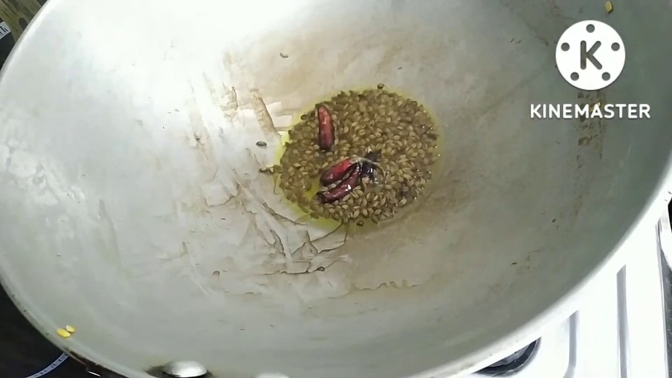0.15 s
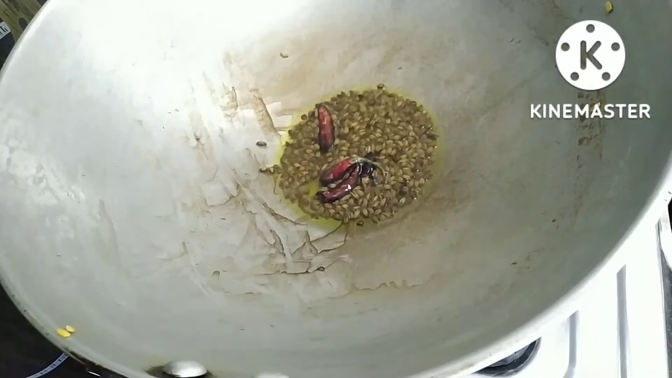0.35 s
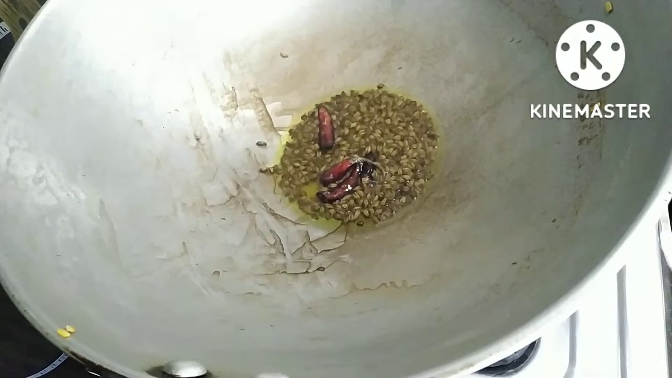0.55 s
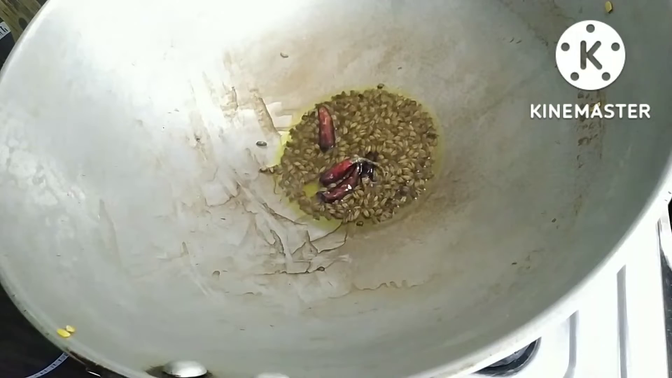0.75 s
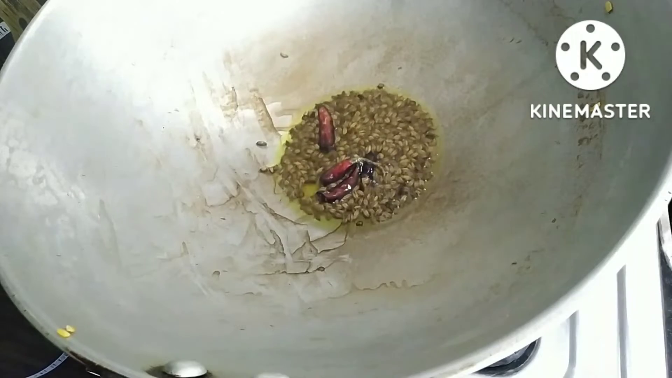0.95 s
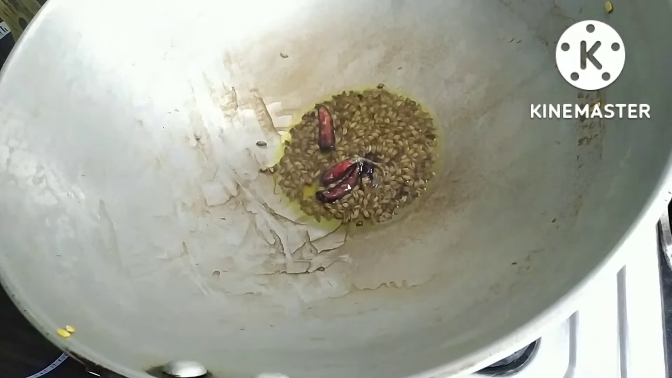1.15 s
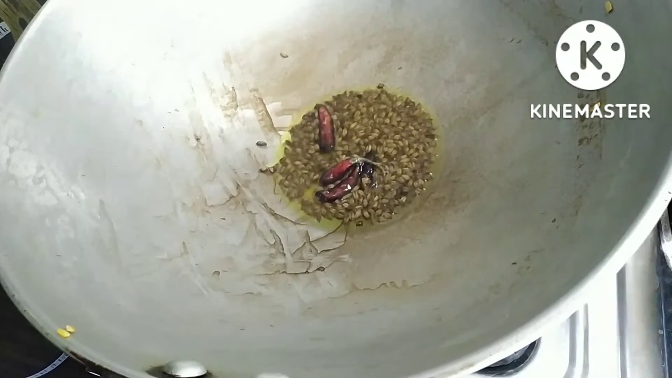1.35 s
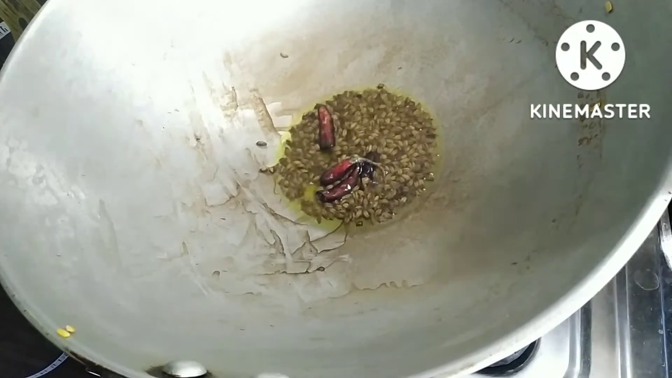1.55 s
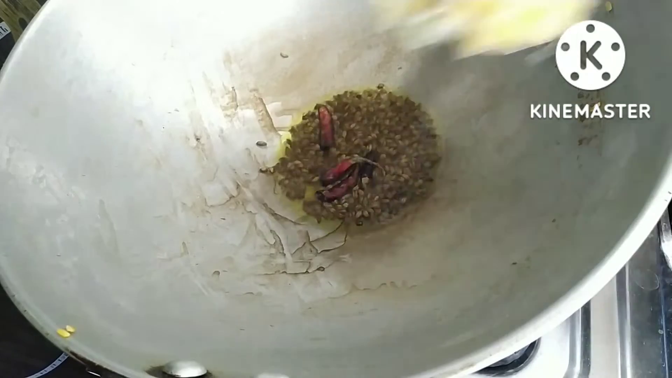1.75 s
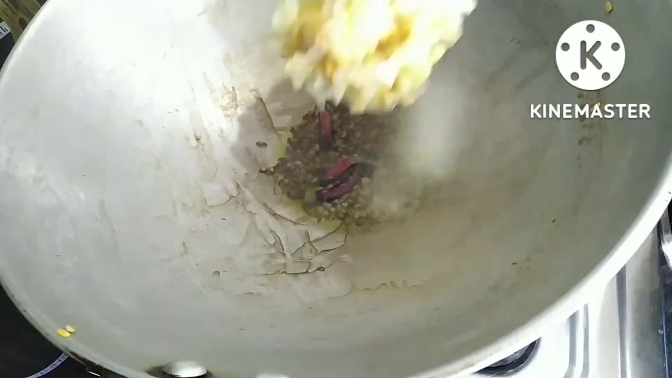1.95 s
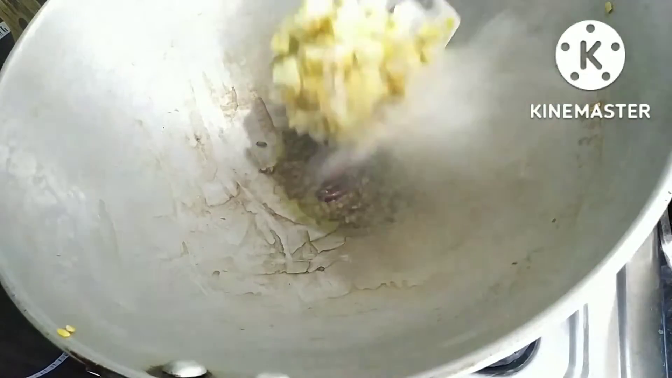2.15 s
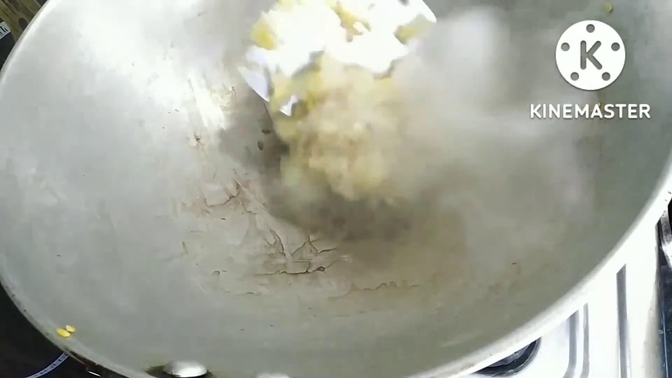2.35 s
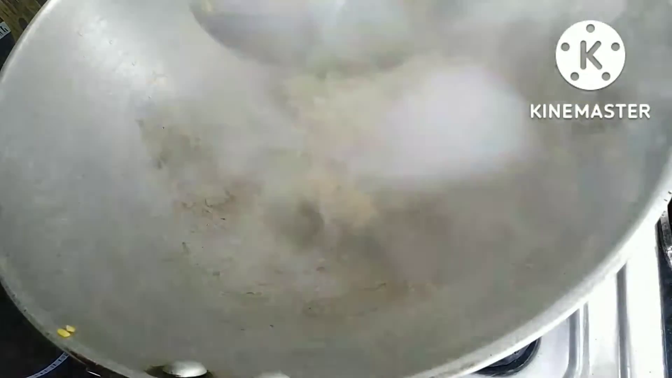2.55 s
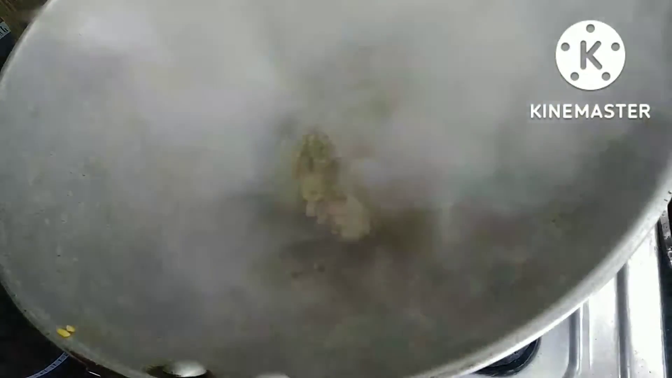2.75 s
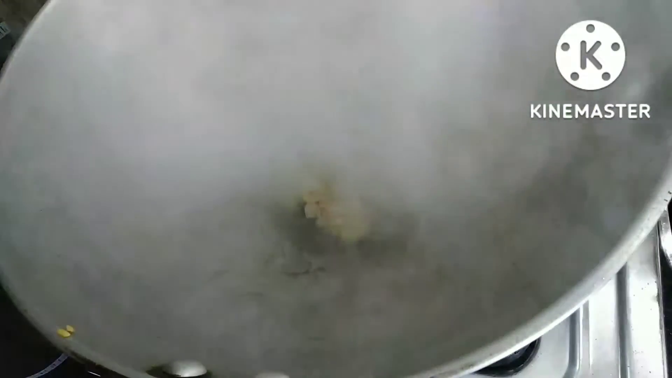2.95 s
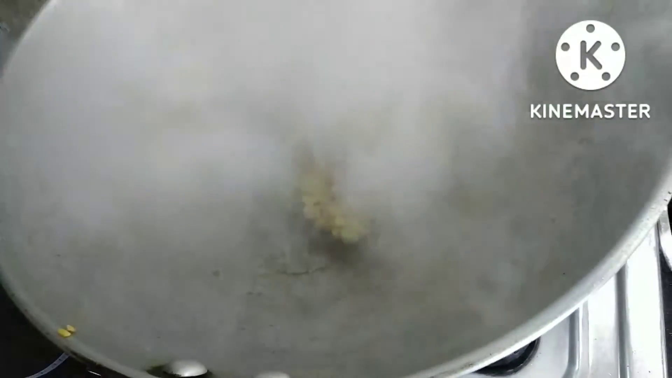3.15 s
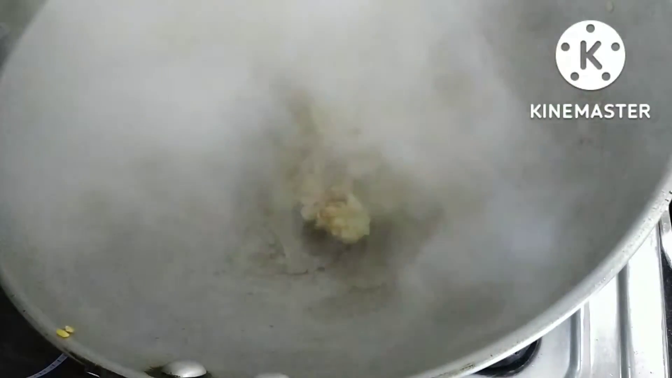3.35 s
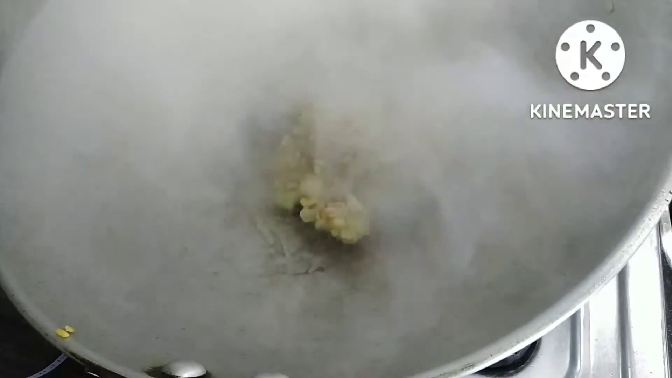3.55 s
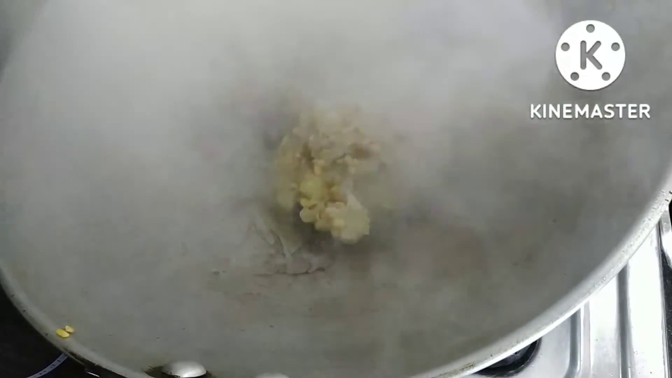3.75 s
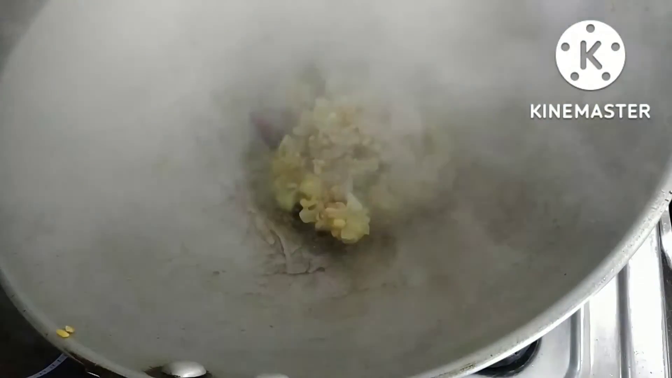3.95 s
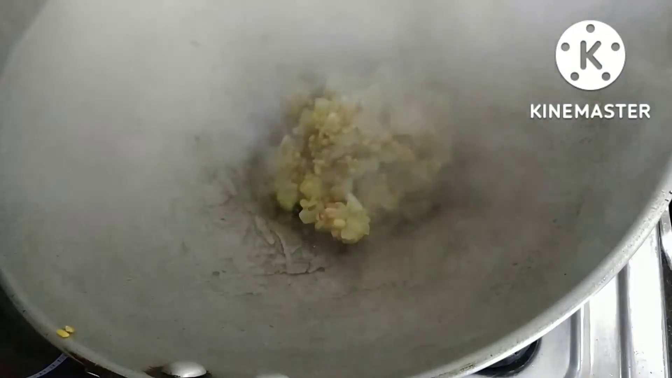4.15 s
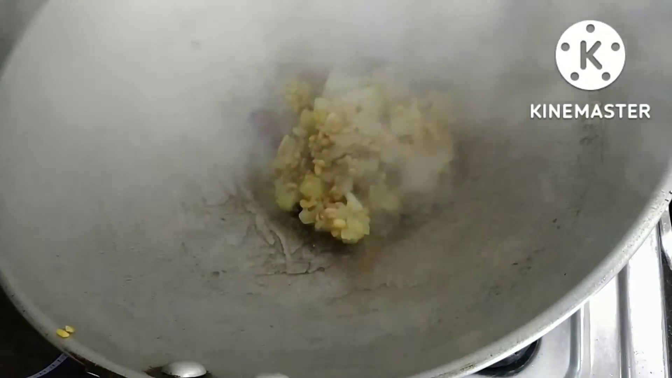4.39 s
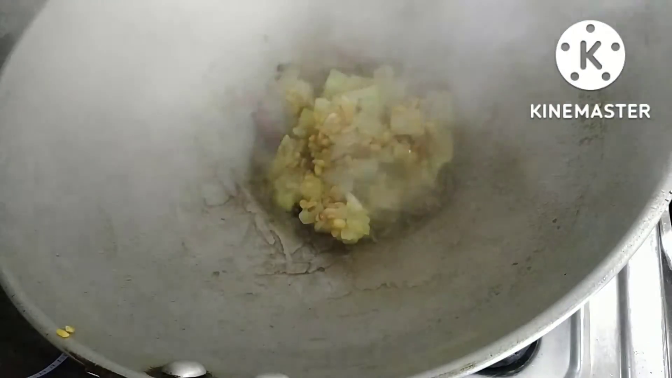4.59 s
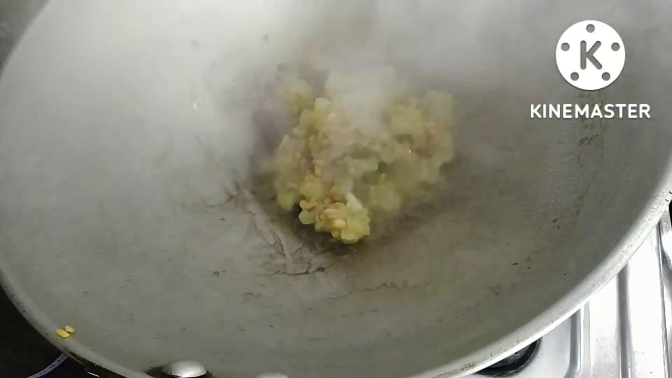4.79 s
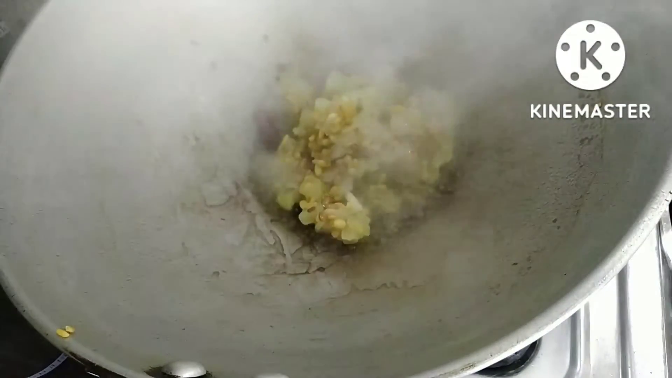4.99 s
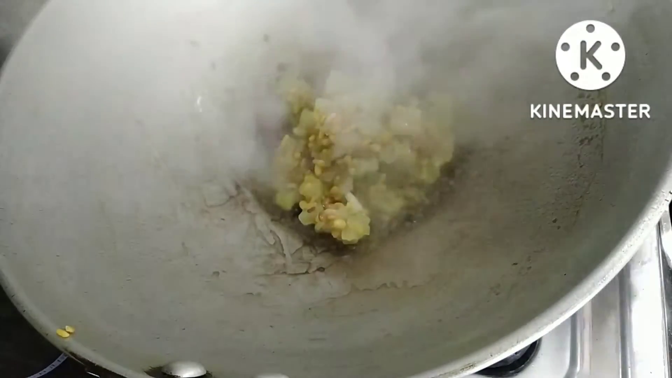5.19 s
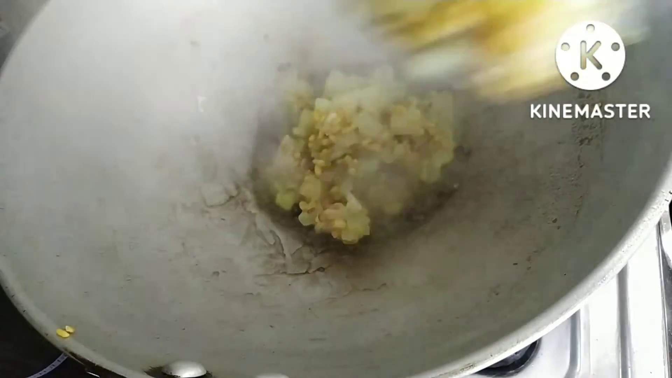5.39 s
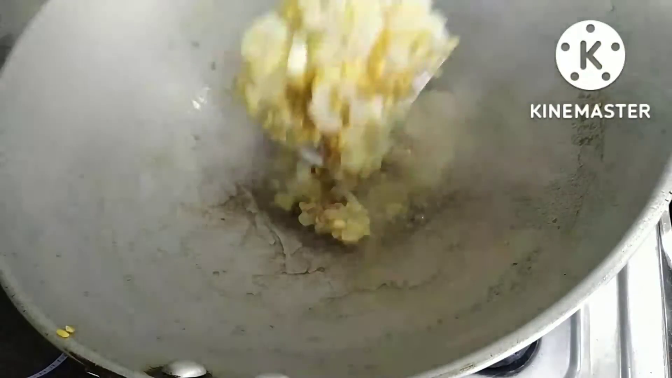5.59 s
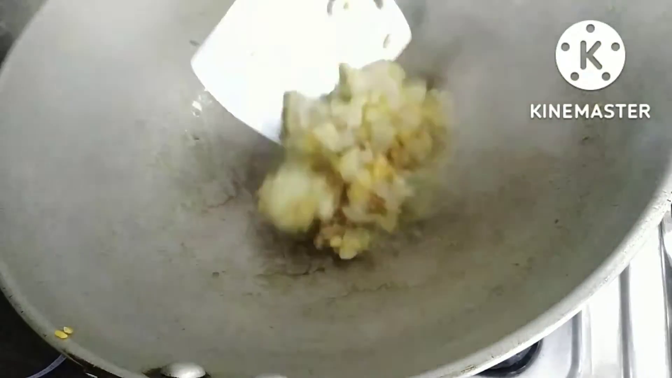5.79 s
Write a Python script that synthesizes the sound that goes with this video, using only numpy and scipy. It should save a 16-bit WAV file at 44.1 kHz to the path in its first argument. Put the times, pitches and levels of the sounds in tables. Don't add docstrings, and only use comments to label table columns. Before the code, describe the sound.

Spiced oil ticks quietly and a ladle knocks a metal bowl, then wet vegetables hit the pan in a violent, distorting sizzle that slowly eases.

```python
import sys
import numpy as np
from scipy import signal
from scipy.fft import rfft, irfft
from scipy.io import wavfile
from scipy.ndimage import uniform_filter1d, minimum_filter1d

SR = 44100
rng = np.random.default_rng(int(sys.argv[2]) if len(sys.argv) > 2 else 0)


def transcribe(signal):
    frames = np.atleast_2d(signal).T
    limited = np.clip(frames, -1, 1)
    pcm = np.round(limited * 32767).astype(np.int16)
    wavfile.write(sys.argv[1], SR, pcm)


def volts_from_db(level):
    exponent = np.asarray(level, float) / 20
    return 10 ** exponent


N = 257014

# t/s, vigour/dB
BOIL = [(2.1, 6), (2.3, 5), (2.45, 9.5), (2.6, 13.5), (2.75, 11.5), (2.95, 5.5), (3.2, 2.5), (3.5, -1),
        (3.9, -4.5), (4.05, -1), (4.3, -1), (4.5, -2.5), (5.0, -3.5), (5.35, -3.5), (5.55, -4.5),
        (5.72, -4.5), (5.8, -2.5), (5.83, -10)]
# f/Hz, level per Hz/dB
SIZZLE_COLOUR = [(60, -22), (200, -28.5), (1000, -20), (2000, -15.5), (3300, -6), (6000, -5.5),
                 (7500, -4.5), (9500, -2), (11500, -4), (14000, -8), (15500, -10.5)]
# f/Hz, share/0-1
SURGE_SHARE = [(300, 1.1), (1500, 0.57), (4000, 0.19), (9000, 0.04)]
# t/s, peak level/dB
SPIKES = [(2.1227, -21), (2.4127, -12), (2.449, -7), (2.4748, -13), (2.766, -1), (2.8073, 0), (3.1005, -8),
          (3.237, -6), (3.2856, -4.5), (3.3784, -5), (3.456, -12.5), (3.547, -9), (3.722, -12),
          (3.8912, -33), (3.97, -11), (3.978, -16), (4.1937, -9.5), (4.3643, -15), (4.423, -14.5),
          (4.542, -15), (4.6852, -9.5), (4.6916, -9.5), (4.7488, -13), (4.8103, -15), (5.2504, -15.5),
          (5.416, -14.5), (5.4529, -14.5), (5.5236, -8.5), (5.538, -12), (5.8278, -14)]
# t/s, peak level/dB, length/s
SLIPS = [
    (2.189, -22, 0.0023),
    (2.465, -29, .003),
    (2.559, -12, 0.0011),
    (2.726, -4.5, 0.0012),
    (2.82, -21, 0.0027),
    (3.97, -33, 0.0033),
    (4.693, -33, 0.0033),
]
# t/s, peak level/dB, pitch f/Hz, left over right/dB, fizz level/dB
POPS = [(.388, -25, 11000, -4, -19), (0.5042, -24, 10300, .5, -25.5), (.5675, -42.5, 9250, 1.5, -11),
        (.628, -25.5, 9940, -1, -24), (.6468, -32, 10300, -1, -20), (0.8328, -26.5, 6740, -7, -7),
        (1.0874, -38, 9860, 3.5, -14), (1.1362, -39, 6750, 6, -5), (1.3278, -35, 12400, 7, -12),
        (1.4161, -39, 11600, 2, -14), (1.638, -33.5, 10000, 1, -13), (1.699, -33, 9300, 3, -9.5),
        (1.7084, -39, 7030, 9, -7), (1.8402, -28, 7450, 0, -13.5), (2.011, -21, 9000, -4, -8),
        (2.0345, -12, 8000, -2, -12)]
# t/s, blow level/dB, left over right/dB, brightness/dB per octave
KNOCKS = [
    (0.8707, -8, 8, 3),
    (0.8806, -21, -18, 0),
    (.889, -46, 0, 1),
    (0.9044, -16, -6, 3.3),
    (1.101, -43, 2, -2),
    (1.165, -40.5, 7.5, -3.5),
    (1.178, -41, 2, 1),
    (1.197, -48, 17, 8),
    (1.335, -43.5, 4, -3.5),
]
# f/Hz, level/dB, time to fall 60 dB t60/s
BOWL_MODES = [(935, -35, 0.087), (1740, -9.5, 0.023), (1960, -24, 0.07), (2860, -20.5, 0.022),
              (4016, -25, 0.059), (4630, -28, 0.16), (5000, -13, 0.0073), (7149, -45, 5.0),
              (8740, -26, 0.062), (9300, -33, 0.19), (11160, -42, 2.7), (11510, -46, 5.0),
              (12000, -33, 0.071), (12400, -37, 0.13),
              (103, -29, .12), (337, -32, 0.16), (477, -30.5, .1), (762, -24.5, 0.05), (842, -24.5, .08)]
# f/Hz, level per Hz/dB
BOWL_CRACK = [(90, -51), (320, -15), (760, -16), (970, 8), (1330, -14), (1700, -2), (2300, -3.5),
              (2800, -8.5), (3400, -10), (4500, -16), (5700, -23), (7500, -8.5), (9700, -4), (15500, -24)]
# t/s, blow level/dB, left over right/dB, brightness/dB per octave
BUMPS = [
    (-.03, -30, 0.5, 4.5),
    (.612, -64, 8, 8),
    (.665, -62, 1, 3.5),
    (.72, -65.5, 5, 5.5),
    (.775, -67, 2, 9),
]
# f/Hz, level/dB, t60/s
POT_MODES = [(116, -8, 0.82), (328, -3, 4.5), (536, -13, 0.25), (697, -6, 0.83), (840, -2, 0.28),
             (1035, -22, 0.59), (1375, -5.5, 5.0), (2105, -22, 0.22), (3600, -43, 5.0), (4050, -11, 0.037),
             (4940, -35, 5.0), (5749, -38, 0.24)]
# f/Hz, level per Hz/dB
POT_CRACK = [(35, -47), (60, -22), (110, 2), (167, -5), (312, 11.5), (599, -12), (705, -7), (1670, -22),
             (2100, -23), (10700, -40), (15500, -51)]
# t/s, level/dB, f/Hz, t60/s
THUDS = [
    (.357, -38.5, 153, 0.12),
    (0.399, -41, 157, .09),
]
# f/Hz, t60/s
KITCHEN = [(200, 0.49), (530, 0.84), (1390, 0.57), (3680, 0.69), (9700, 0.43)]
# f/Hz, level per Hz/dB
FLOOR = [(18, -56), (35, -45), (70, -1), (120, -8.5), (170, -18.5), (300, -26.5), (600, -23), (1300, -27),
         (3200, -22.5), (5300, -21), (6500, -20), (10500, -18), (13000, -24.5), (15600, -29)]
# f/Hz, likeness/0-1
FLOOR_SAME = [(100, 0.97), (300, 0.75), (800, .2), (3000, 0.023)]
# f/Hz, rms level/dB
HUM = [(226.1, -81), (522.2, -80), (640.6, -86), (710.6, -80.5)]
# f/Hz, rarity of a gap/standard deviations
GAPS = [(2200, 3.6), (3000, 2.3), (3500, 1.45), (5600, 1.55), (7000, 2.7), (10500, 3.2), (12800, 1.55),
        (14300, 1.7), (15000, 2.6)]

LEAD = 4410
LANDS_S, SPREAD_S = 2.014, 0.077
FIRST_DROPS_DB, SPREAD_BEND = -22.5, 1.32
SIZZLE_DB, SIZZLE_FOLLOWS, SURGE_FOLLOWS = -17, 0.26, 0.93
LOW_LAG_DB = -28
FLASH_DB, FLASH_FADES_S, FLASH_FULL_HZ = 2.5, 0.31, 12000
CRACKLE_DB, CRACKLE_FOLLOWS, CRACKLE_SPREAD, CRACKLE_FADE_DB_PER_S = -32.5, 0.3, 1.52, 3
SPIKES_PER_S, SPIKE_OVER_DB, SPIKE_FOLLOWS = 17, 0, 0.48
SPIKE_SCATTER_DB, SPIKE_CAP = 5, 1.2
RUMBLE_EXTRA_DB, RUMBLE_END_DB, RUMBLE_SETTLE_S = 16, -5.5, 0.58
FIZZ_EXTRA_DB, FIZZ_END_DB, FIZZ_SETTLE_S = 4, -3, 0.84
STIR_S, STIR_DB, STIR_LASTS_S = 1.16, 5.5, 0.092
FLOOR_DB, RUMBLE_TOP_HZ = -55.5, 250


def spread(t):
    return np.clip((t - LANDS_S) / SPREAD_S, 0, 1)


def swell_db(t):
    first = volts_from_db(FIRST_DROPS_DB)
    return 20 * np.log10(first + (1 - first) * spread(t) ** SPREAD_BEND)


def sizzle():
    t = np.arange(N) / SR

    def shape_db(hz, s):
        surge_db = SURGE_FOLLOWS * curve(BOIL, s) + LOW_LAG_DB * (1 - spread(s))
        flash_tilt = np.minimum(hz / FLASH_FULL_HZ, 1) ** 2
        flash_db = FLASH_DB * flash_tilt * np.exp(-abs(s - LANDS_S) / FLASH_FADES_S)
        return read(SIZZLE_COLOUR, hz) + read(SURGE_SHARE, hz) * surge_db + flash_db

    dense = hiss(shape_db, lambda hz: 0.085 + 0 * hz, lag=5.02, patchy_db=0.65)
    bursts = (rng.random(N) < 300 / SR) * np.minimum(rng.exponential(1, N), 4)
    flicker = 1 + 0.1 * signal.lfilter([1], [1, -np.exp(-1 / (0.00065 * SR))], bursts)
    flicker /= np.sqrt(np.mean(flicker ** 2))
    port_db = np.array([[4.1], [4.9]])
    level_db = SIZZLE_DB + SIZZLE_FOLLOWS * curve(BOIL, t) + swell_db(t) + port_db
    return volts_from_db(level_db) * dense * flicker * (t > LANDS_S)


def crackle():
    t = np.arange(N) / SR
    level_db = CRACKLE_DB + CRACKLE_FOLLOWS * curve(BOIL, t) + CRACKLE_SPREAD * swell_db(t)
    level_db -= CRACKLE_FADE_DB_PER_S * (t - LANDS_S)
    u = np.arange(-40, 400)
    creep = 0.02 * np.exp(-u / 90.0) * (u > 0)
    blip = np.exp(-0.5 * (u / 2.43) ** 2) + creep

    clumps = volts_from_db(3.0 * evened(uniform_filter1d(rng.standard_normal(N), size=500)))
    per_s = 900 * volts_from_db(0.6 * (level_db + 38.5)) * clumps
    sign = np.where(rng.random(N) < 0.12, -1, 1)
    size = volts_from_db(2.06 * np.minimum(rng.exponential(1, N), 3)) * sign
    train = size * (rng.random(N) < per_s / SR)
    small = signal.oaconvolve(train - uniform_filter1d(train, size=4000), blip)[40:N + 40]
    small *= volts_from_db(level_db + 9.5) / np.sqrt(uniform_filter1d(small ** 2, size=13000) + 1e-9)

    scatter_db = SPIKE_SCATTER_DB * np.minimum(rng.standard_normal(N), SPIKE_CAP)
    large_db = SPIKE_OVER_DB + SPIKE_FOLLOWS * level_db + scatter_db + 4.5
    large = (rng.random(N) < SPIKES_PER_S / SR) * spread(t) * volts_from_db(large_db)
    s, db = np.transpose(SPIKES)
    large[np.minimum(np.round(s * SR).astype(int), N - 1)] = volts_from_db(db + 6.5)

    both = small * (t > LANDS_S) + signal.oaconvolve(large, blip)[40:N + 40]
    low_cut = signal.butter(2, 45, "high", fs=SR, output="sos")
    return signal.sosfilt(low_cut, both) * volts_from_db(np.array([[-28], [0]]))


def slips():
    t, out = np.arange(N) / SR, np.zeros((2, N))
    for s, db, length in SLIPS:
        u = np.clip((t - s) / length, 0, 30)
        out[1] -= volts_from_db(db) * np.e * u * np.exp(-u)
    return out


def pop(db, hz, fizz_db):
    t = np.arange(1024) / SR
    fizz_colour = [(0.11 * hz, -50), (0.66 * hz, -22), (0.93 * hz, -4), (hz, 0), (1.25 * hz, -6), (1.6 * hz, -22)]
    fizz = volts_from_db(fizz_db) * coloured(fizz_colour, count=1024) * np.exp(-t / 0.0055)
    snap = pulse([(1000, -36), (3500, -7), (hz, 0), (16000, -3)], count=1024)
    tick = 0.84 * np.sin(2 * np.pi * hz * t) * np.exp(-t / 0.00036)
    onset = np.minimum(t / 0.000051, 1)
    return volts_from_db(db) * ((tick + fizz) * onset + 1.26 * snap)


def knock(modes, colour, db, bright_db, damping, blow_db, crack_db, crack_s):
    t = np.arange(LEAD * 3) / SR
    ring = np.zeros(len(t))
    for hz, mode_db, t60 in modes:
        detune = rng.uniform(0.95, 1.015)
        held_t60 = min(t60, damping * np.sqrt(1000 / hz))
        fall_db = mode_db + bright_db * np.log2(hz / 1000) - 60 * t / held_t60
        ring += volts_from_db(fall_db) * np.sin(2 * np.pi * hz * detune * t)
    tilted = [(hz, c_db + bright_db * np.log2(hz / 1000)) for hz, c_db in colour]
    crack = volts_from_db(crack_db) * coloured(tilted, count=len(t)) * np.exp(-t / crack_s)
    blow = volts_from_db(blow_db) * pulse(tilted, count=len(t))
    return volts_from_db(db) * ((ring + crack) * np.minimum(t / 0.0004, 1) + blow)


def thud(db, hz, t60):
    t = np.arange(LEAD) / SR
    return volts_from_db(db - 60 * t / t60) * np.sin(2 * np.pi * hz * t) * np.minimum(t / 0.0031, 1)


def kitchen(x):
    taps = np.zeros((2, SR))
    at = np.arange(260, SR - 20, 20) + rng.integers(0, 20, (2, (SR - 261) // 20))
    np.put_along_axis(taps, at, rng.choice([-1., 1.], at.shape), 1)
    hz, t, z = signal.stft(taps, SR, nperseg=256)
    fall = volts_from_db(-60 * t / read(KITCHEN, hz)[:, None])
    tail = signal.istft(z * fall, SR, nperseg=256)[1]
    return signal.fftconvolve(x, tail / np.linalg.norm(tail[0]), axes=1)[:, :x.shape[1]]


def floor():
    def shape_db(hz, s):
        rumble_db = RUMBLE_END_DB + RUMBLE_EXTRA_DB * np.exp(-s / RUMBLE_SETTLE_S)
        stir_db = STIR_DB * np.exp(-((s - STIR_S) / STIR_LASTS_S) ** 2) * (hz > 5500)
        fizz_db = FIZZ_END_DB + FIZZ_EXTRA_DB * np.exp(-s / FIZZ_SETTLE_S) + stir_db
        return read(FLOOR, hz) + np.where(hz < RUMBLE_TOP_HZ, rumble_db, fizz_db)

    noise = hiss(shape_db, lambda hz: read(FLOOR_SAME, hz), lag=0, patchy_db=2.5, size=1024)
    return volts_from_db(FLOOR_DB + 2.0) * noise


def hum():
    t = np.arange(N) / SR
    wander = np.cumsum(rng.standard_normal((N, len(HUM))), axis=0).T * 0.0089
    return sum(volts_from_db(db + 1.5) * np.sin(2 * np.pi * hz * t + w) for (hz, db), w in zip(HUM, wander))


def hiss(shape_db, same, lag, patchy_db, size=512):
    hop = size // 4
    frames, hz = N // hop + 5, np.fft.rfftfreq(size, 1 / SR)[:, None]
    a, b, c, d, patches = rng.standard_normal((frames, len(hz), 5)).T
    patches = uniform_filter1d(patches, size=7, axis=0)
    patches = evened(uniform_filter1d(patches, size=14, axis=1))
    same, right = np.clip(same(hz), -1, 1), a + 1j * b
    late = np.exp(-2j * np.pi * hz * lag / SR)
    left = same * right * late + np.sqrt(1 - same ** 2) * (c + 1j * d)
    level_db = shape_db(hz, np.arange(frames) * hop / SR) + patchy_db * patches
    z = np.array([left, right]) * volts_from_db(level_db)
    return evened(signal.istft(z, nperseg=size, noverlap=size - hop)[1][:, :N])


def coloured(points, count):
    hz = np.fft.rfftfreq(count, 1 / SR)
    return evened(irfft(rfft(rng.standard_normal(count)) * volts_from_db(read(points, hz)), count))


def pulse(points, count):
    hz = np.abs(np.fft.fftfreq(count, 1 / SR))
    log_gain = np.log(volts_from_db(read(points, hz)))
    click = np.fft.ifft(np.exp(np.conj(signal.hilbert(log_gain)))).real
    return click / np.linalg.norm(click)


def evened(x):
    return x / np.sqrt(np.mean(x ** 2) + 1e-20)


def read(points, hz):
    f, value = np.transpose(points)
    return np.interp(np.log(hz + 1), np.log(f + 1), value)


def curve(rows, t):
    times, values = np.transpose(rows)
    return np.interp(t, times, values)


def add(mix, s, sound, pan_db):
    part = mix[:, LEAD + round(s * SR):][:, :len(sound)]
    part += volts_from_db(np.array([[0.5], [-0.5]]) * pan_db) * sound[:part.shape[1]]


def gaps(x):
    hz, t, z = signal.stft(x, SR, nperseg=2048, noverlap=1536)
    chance = rng.standard_normal((len(t), len(hz))).T + 0.11 * rng.standard_normal(len(hz))[:, None]
    chance = evened(uniform_filter1d(uniform_filter1d(chance, size=5, axis=0), size=3, axis=1))
    chance = -minimum_filter1d(minimum_filter1d(-chance, size=4, axis=0), size=5, axis=1)
    level_db = 10 * np.log10((abs(z[:, 100:]) ** 2).sum((0, 1)) + 1e-12)
    before_db = minimum_filter1d(level_db, size=4, origin=1)
    attack = np.maximum(np.roll(level_db, -1), level_db) - before_db > 6
    kept = np.clip((read(GAPS, hz)[:, None] - chance) / 0.15 + 99 * attack, 0, 1)
    return signal.istft(z * kept, SR, nperseg=2048, noverlap=1536)[1][:, :N]


def scene():
    pops, knocks = np.zeros((2, 2, N + LEAD))
    for s, db, hz, pan_db, fizz_db in POPS:
        add(pops, s + 0.001, pop(db, hz, fizz_db), pan_db)
    for s, db, pan_db, bright_db in KNOCKS:
        sound = knock(BOWL_MODES, BOWL_CRACK, db, bright_db,
                      damping=0.13, blow_db=6.5, crack_db=-13, crack_s=0.0073)
        add(knocks, s, sound, pan_db)
    for s, db, pan_db, bright_db in BUMPS:
        sound = knock(POT_MODES, POT_CRACK, db, bright_db,
                      damping=0.19, blow_db=27.0, crack_db=9.5, crack_s=0.011)
        add(knocks, s, sound, pan_db)
    for s, db, hz, t60 in THUDS:
        add(pops, s, thud(db, hz, t60), 0)
    events = pops + knocks + kitchen(volts_from_db(-7) * pops + volts_from_db(-3.0) * knocks)
    return sizzle() + crackle() + slips() + events[:, LEAD:] + floor() + hum()


def low_pass(x):
    return signal.sosfilt(signal.butter(12, 16170, fs=SR, output="sos"), x)


def record(dry):
    soft = np.tanh(0.8 * dry) / 0.73
    soft = signal.sosfilt(signal.butter(4, 44, "high", fs=SR, output="sos"), soft)
    high_cut = signal.firwin(1023, 15500, window=("kaiser", 9), fs=SR)
    limited = signal.oaconvolve(soft, high_cut[None], "same")
    clipped = np.clip(gaps(limited), -1, 1)
    return low_pass(clipped)


dry = scene()
out = record(dry)
transcribe(out)
```